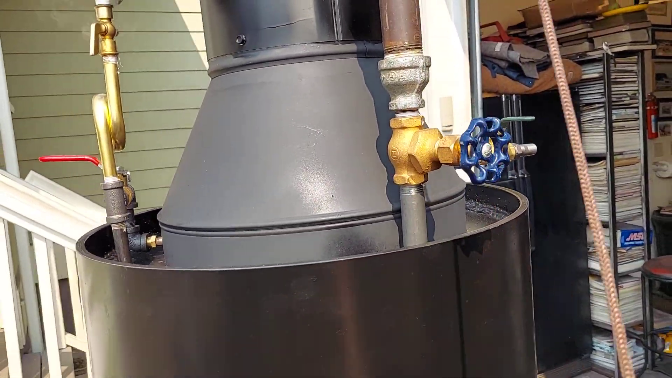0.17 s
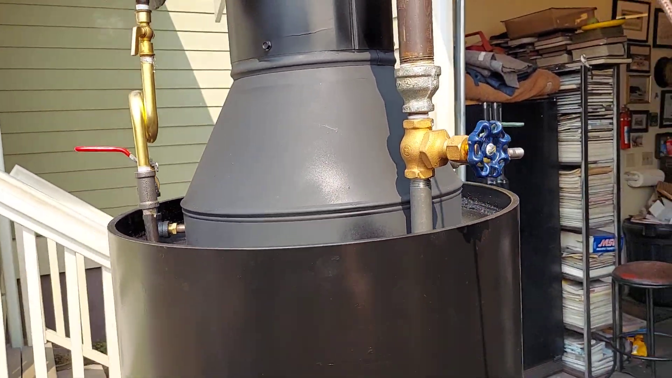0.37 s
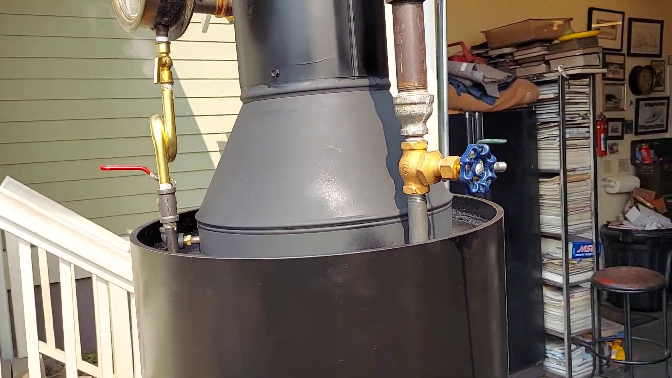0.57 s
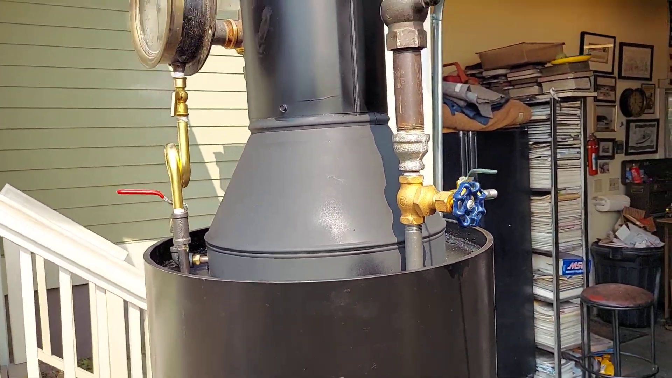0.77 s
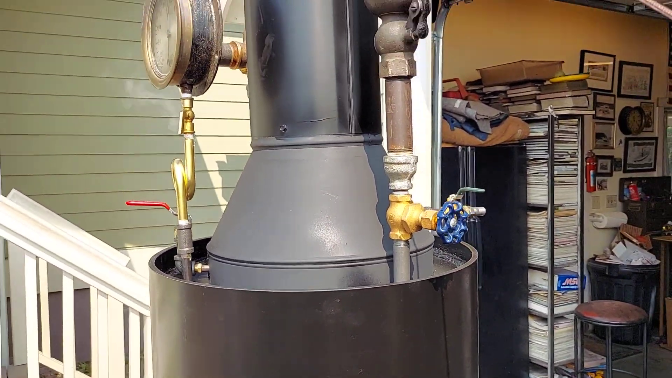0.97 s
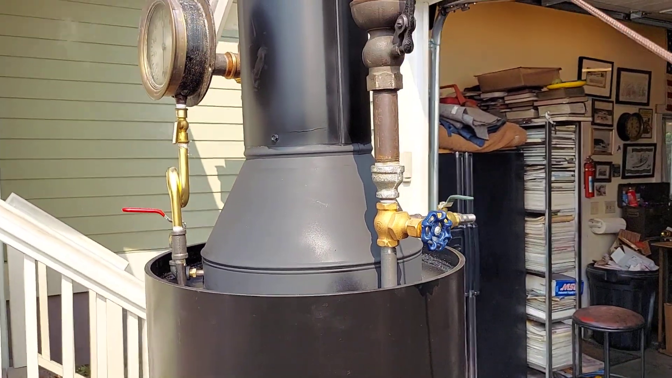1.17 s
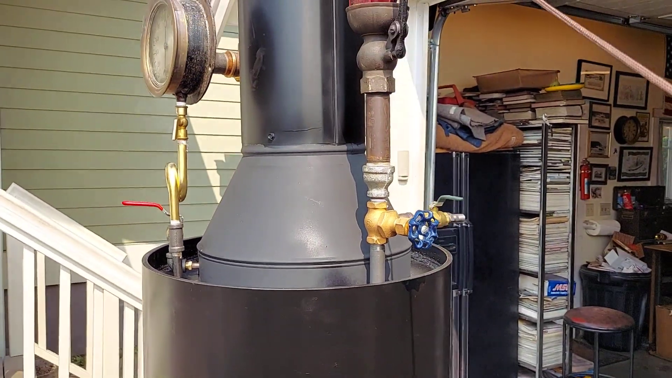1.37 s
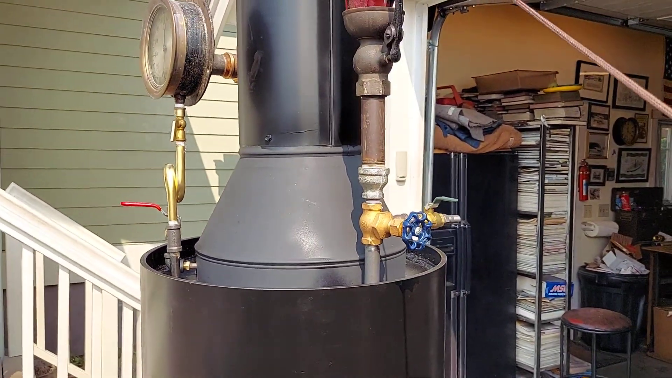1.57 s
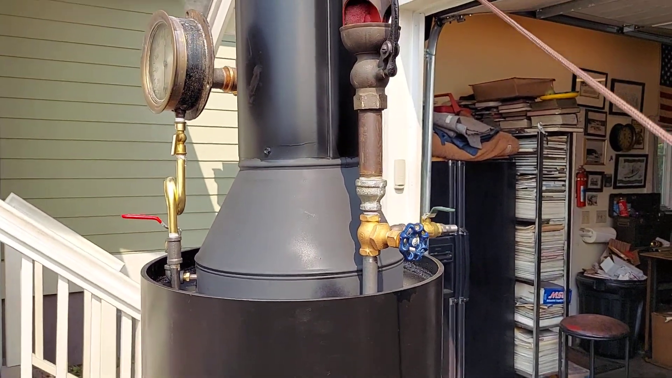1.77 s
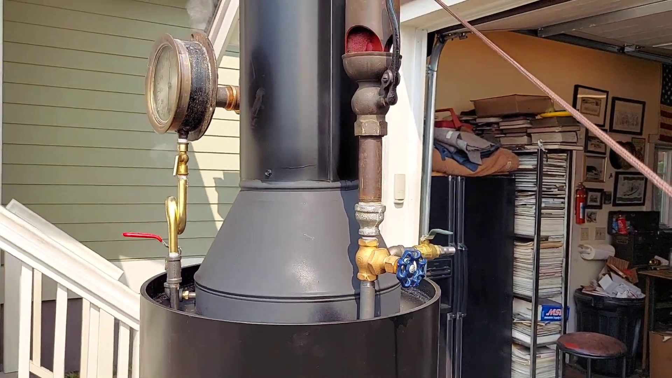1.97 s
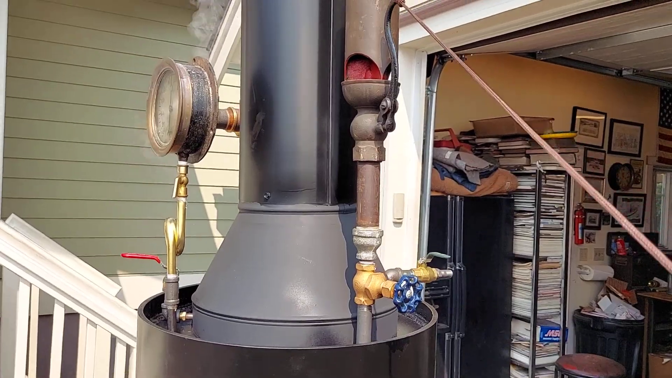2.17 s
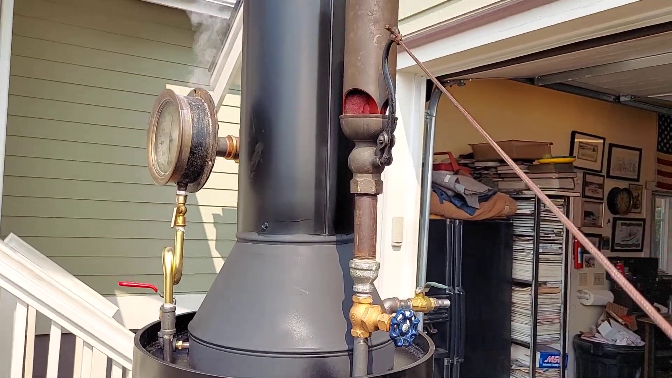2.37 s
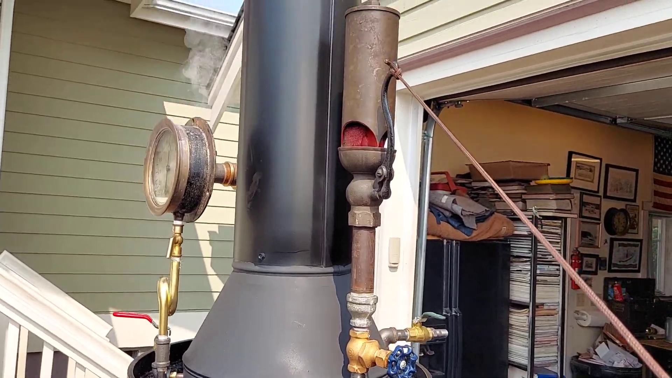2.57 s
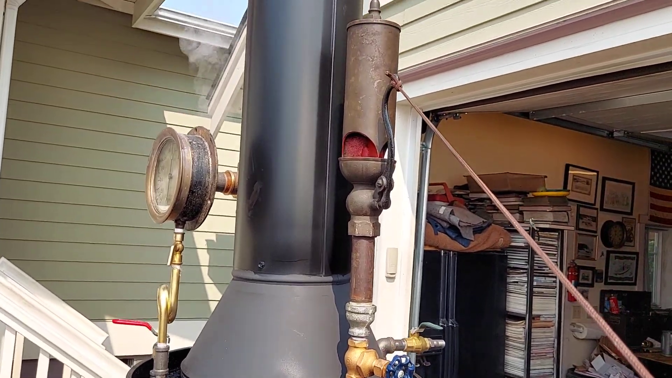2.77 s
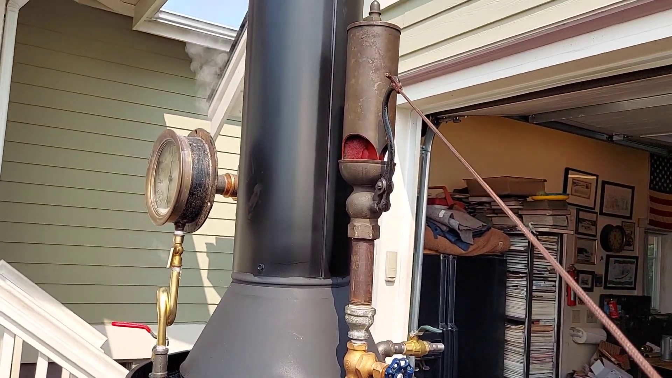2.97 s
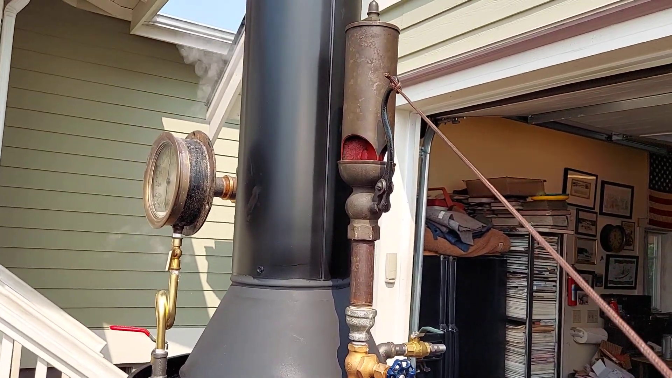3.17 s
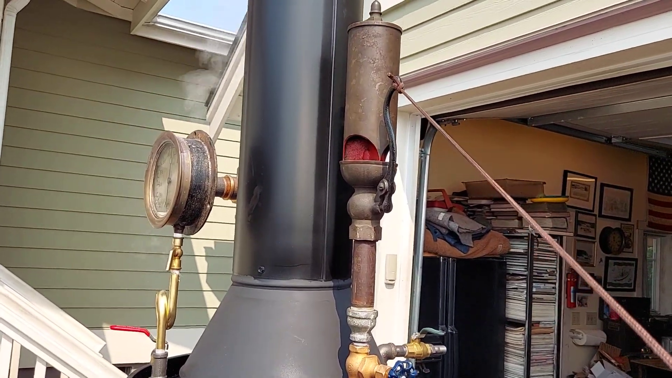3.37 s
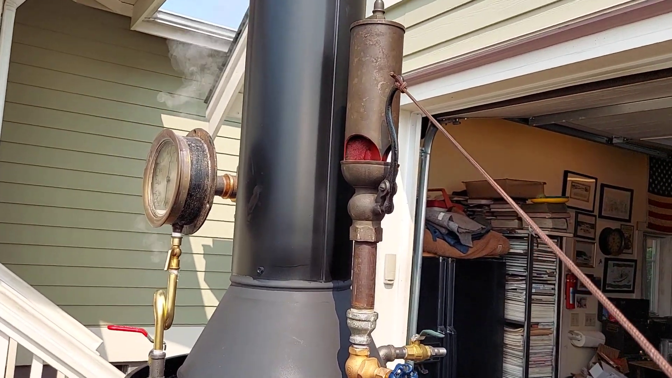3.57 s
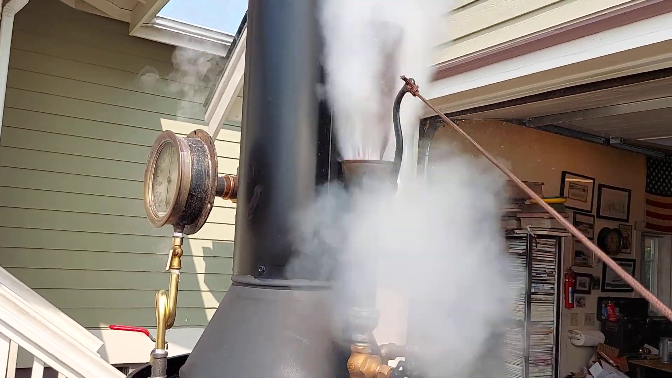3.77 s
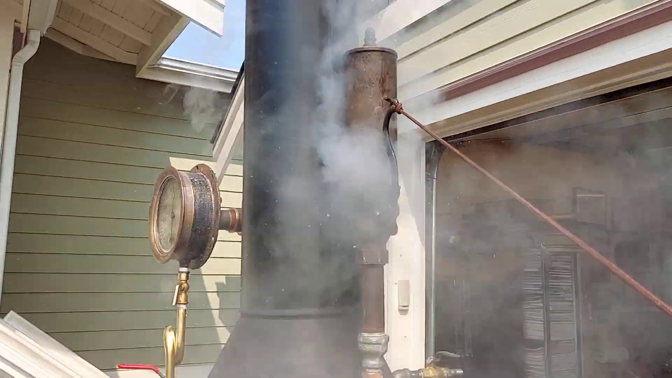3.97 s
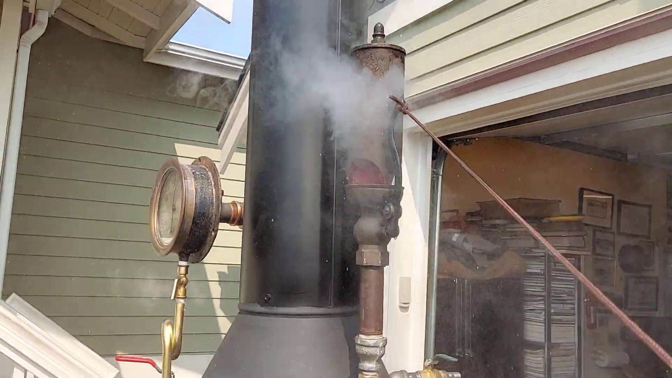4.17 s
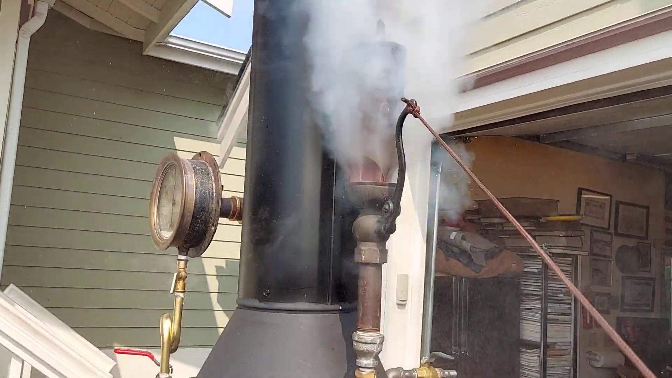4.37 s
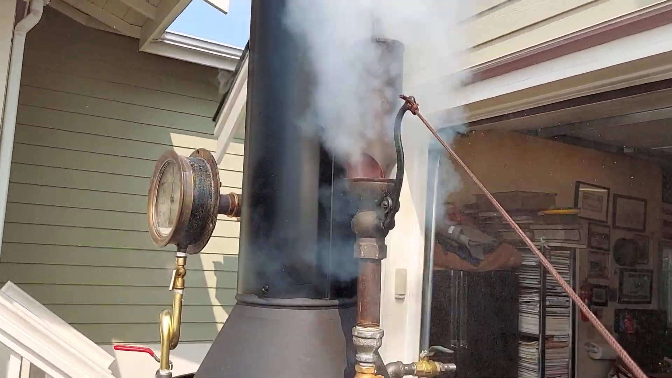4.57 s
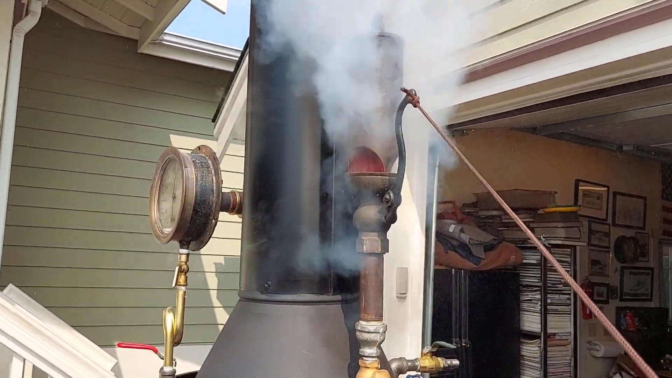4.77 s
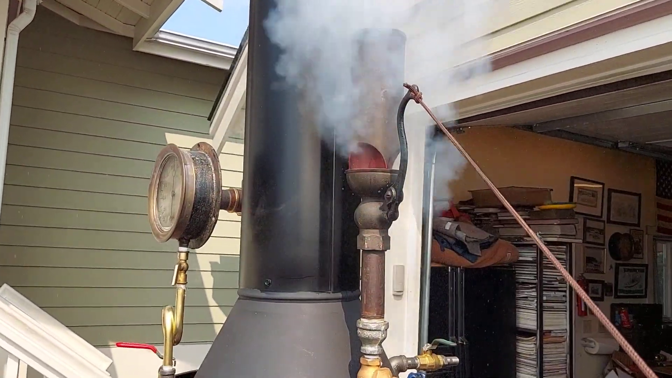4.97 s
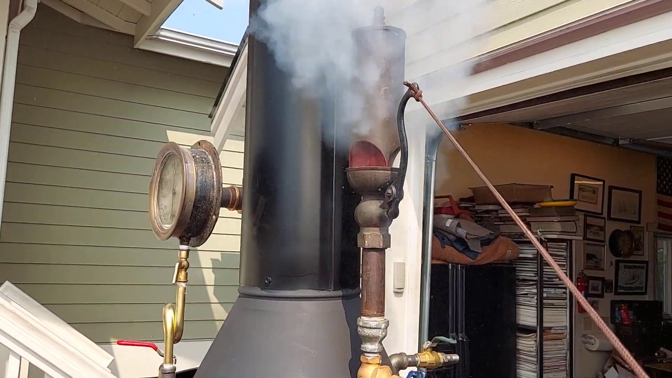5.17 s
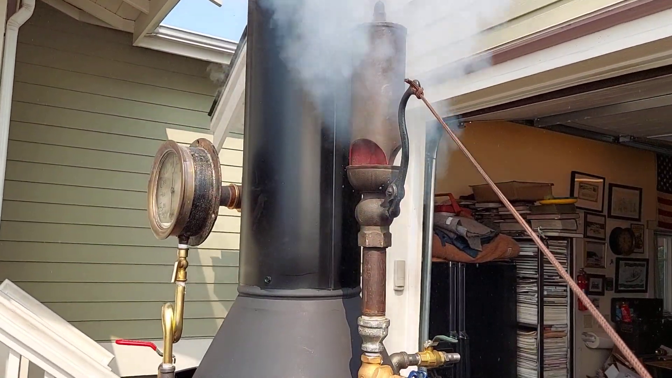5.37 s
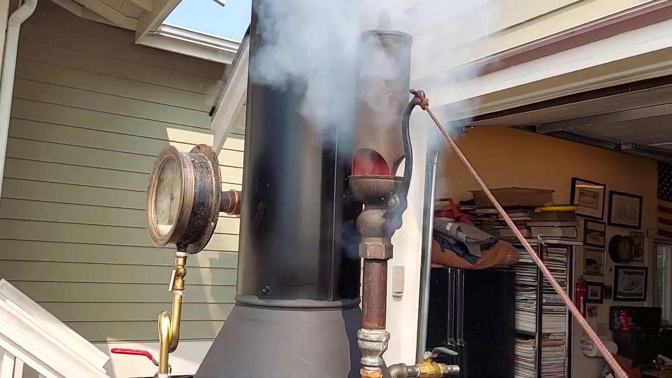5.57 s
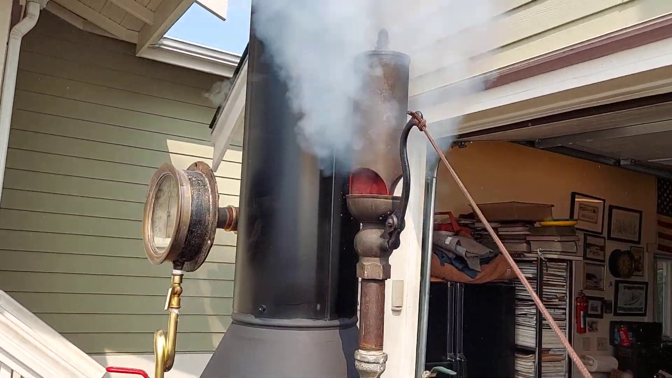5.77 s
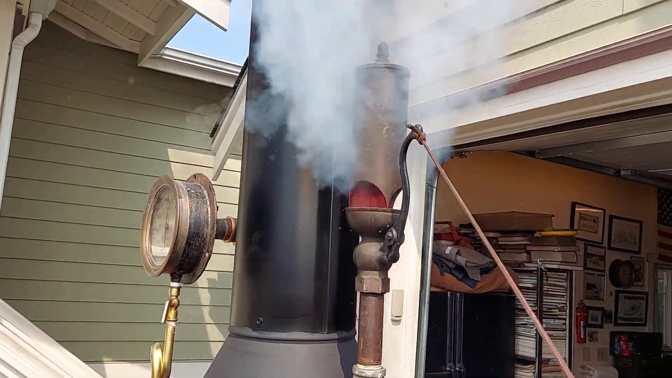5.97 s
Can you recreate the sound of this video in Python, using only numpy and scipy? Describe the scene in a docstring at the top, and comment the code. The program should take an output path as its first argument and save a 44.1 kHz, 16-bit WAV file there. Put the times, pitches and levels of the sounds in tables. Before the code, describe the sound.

From 0 to 3.6 seconds a small boiler idles quietly outdoors by an open garage: uneven low burner rumble, a chimney drone that swells and fades, thin fizzing steam and faint airy pipe resonances. Small scuffs or ticks come near 0.2, 0.4 and 0.7, a duller bump around 1.0, a faint one at 2.4 and a hollow scrape at 3.4. At about 3.7 the steam whistle bursts in very loud, with a watery thump, spitting hiss and unstable, flat notes climbing quickly. It shuts at 4.0; a beating echo drops away fast. At 4.24 it blasts again, scooping up into a rough three-note chord around the octave above middle C, with higher overtones. Bright hiss, mid rush and low buffeting surround it. The chord sharpens slightly, wavers and holds until the cut at 6.0. Phone pickup a few metres away, wide stereo, the background pushed down by the blast.

```python
"""A three-chamber steam whistle on a small boiler, a few metres from a phone by an open garage.
First a quiet wait: filtered noise as burner rumble, chimney drone and leaking steam, with a few scuffs.
Then the rope is pulled: a short wet blast, a falling echo of beating tones, and a long blast.
Each chamber is a stopped pipe, sines on its first and third mode, whose pitch climbs as it warms.
The jet is shaped noise: it hisses, rushes and buffets the phone, and the yard sinks under the blast."""
import sys
import numpy as np
from scipy import signal
from scipy.fft import rfft, irfft
from scipy.io import wavfile
from scipy.ndimage import uniform_filter1d

SR = 44100
rng = np.random.default_rng(int(sys.argv[2]) if len(sys.argv) > 2 else 0)


def put_to_file(sound):
    """Save the sound as 16-bit audio at rate SR, in the file named by the first command-line argument."""
    columns = np.atleast_2d(sound).T  # one column per channel
    safe = np.clip(columns, -1, 1)
    whole_steps = np.round(safe * 32767)
    wavfile.write(sys.argv[1], SR, whole_steps.astype(np.int16))


N = 264996
T = np.arange(N) / SR  # time [s]
F = np.arange(N // 2 + 1) * SR / N  # frequency [Hz]

# direction of the tones, left minus right: (time [s], first modes [dB], third mode of chambers 1, 2, 3 [dB])
TONE_DIRECTION = [(3.7, 6, 1, 11, 6), (3.79, -10, 2, 11, 5), (3.92, -21, -8, -2, 3.5), (4.0, 6, -6, 24, 4),
                  (4.05, 1, 22, 11, 7), (4.23, 5, 0, 6, 2), (4.34, -24, -15, 1, 3), (4.5, -19, -8, 12, 5),
                  (4.84, -19.5, -14, 13, 4), (4.93, -19, -6, -3, 3), (6.009, -16.5, -1.5, 0, 2.5)]

SHUT_FROM_S, SHUT_TO_S = 4.0, 4.228  # the valve is closed and only the garage echo is heard
SHORT_OPENS_S, LONG_OPENS_S = 3.76, 4.235  # steam begins to warm the chambers
FLAT_HZ = 15100  # hiss spectra stay level above this


def whistle():
    """Stopped-pipe resonance: odd modes dominate; turbulence shakes pitch and level, and the echoes beat."""
    # per chamber: (third mode multiple, left offset of first mode [dB], left lead of first, of third mode [rad])
    voicing = [(3, -1.5, 0.49, 0.46), (3, 9, 0.46, -0.99), (2.98, -1, 0.85, -0.077)]
    # per chamber: (warm pitch [Hz], flat share at start of short pull, of long pull, warming time [s],
    # echo fall of first mode [dB/s], of third mode [dB/s])
    chambers = [(541, .075, .05, .33, 170, 134), (626, .055, .045, .7, 147, 166),
                (729.2, .05, .048, .45, 135, 170)]
    # per chamber, one table for each pull: (time [s], first mode [dB], third mode [dB])
    mode_levels = [
        [[(3.66, -70, -53), (3.704, -43, -37), (3.714, -17, -22), (3.742, -14, -33), (3.765, -37, -46),
         (3.79, -17.5, -16.5), (3.85, -14, -21.5), (3.9, -23, -21), (3.96, -24.5, -21), (3.993, -12, -31),
         (4.015, -24, -31)], [(4.232, -53, -45), (4.243, -40, -12.5), (4.27, -28, -9), (4.32, -24.5, -29),
         (4.37, -26.5, -21.5), (4.7, -24.5, -26), (5.0, -24, -23), (6.009, -24.5, -22.5)]],
        [[(3.66, -75, -56), (3.703, -44, -31), (3.716, -26, -31), (3.76, -31, -35), (3.82, -35, -16),
         (3.86, -47, -15.5), (3.915, -39, -13), (3.936, -33, -42), (3.955, -17, -19), (3.98, -21, -18),
         (4.01, -23.5, -26.5)], [(4.228, -55, -40), (4.246, -21, -28), (4.272, -49, -10.5), (4.32, -39, -12),
         (4.35, -25, -22), (4.45, -30, -25.5), (4.9, -33, -26), (5.3, -31, -25), (5.5, -31, -19.5),
         (6.009, -26, -21.5)]],
        [[(3.66, -64, -70), (3.696, -55, -36), (3.725, -15.5, -34), (3.77, -41, -43), (3.795, -18, -27),
         (3.85, -21.5, -30), (3.966, -16, -28), (3.985, -29, -42), (4.0, -25, -42)], [(4.226, -57, -54),
         (4.245, -27, -42), (4.27, -22, -21), (4.295, -19, -31), (4.43, -15, -36), (4.52, -16, -31),
         (4.68, -15.5, -32.5), (6.009, -16, -37.5)]],
    ]
    # per chamber, weak overtones: (multiple, level against the mean of both modes' levels [dB])
    overtones = [
        [(2, -15.5), (6, -20)],
        [(2, -14.5), (4, -15.5), (5, -18), (6, -19.5)],
        [(2, -34), (4, -16)],
    ]
    # per chamber: share by which the third mode runs sharp in the short pull
    wet_sharp = (.012, .002, .002)
    waver_hz, flutter_db = 1.496, 0.63
    first_pan_db, *third_pans_db = curves(TONE_DIRECTION)
    shut = uniform_filter1d(1. * (T > SHUT_FROM_S) * (T < SHUT_TO_S), size=800)
    out, firsts = 0, []
    for voice, chamber, pulls, weak, sharp, third_pan_db in zip(
            voicing, chambers, mode_levels, overtones, wet_sharp, third_pans_db):
        third, offset_db, first_lead, third_lead = voice
        *tuning, first_fall, third_fall = chamber
        first_db, third_db = played(pulls, (first_fall, third_fall))
        phase = 2 * np.pi * np.cumsum(pitch(*tuning) + waver_hz * walk(60)) / SR
        firsts.append((phase, first_db))
        # the sharpening phase stops growing when the long pull begins
        short_phase = np.minimum(phase, phase[int(SHUT_TO_S * SR)])
        third_phase = third * (phase + sharp * short_phase)
        partials = [
            (third_phase, third_db, third_pan_db + 1.9 * walk(11), third_lead + 0.45 * walk(9.4)),
            (phase, first_db, first_pan_db + offset_db + 2.8 * walk(6.7), first_lead)]
        for multiple, db in weak:
            # the second partial rides on the steam sheet and weakens with it
            weak_db = (first_db + third_db) / 2 + db - 9 * shut * (multiple == 2)
            partials.append((multiple * phase, weak_db, third_pan_db / 2, 0))
        for partial_phase, db, pan_db, lead in partials:
            shaken_db = db + flutter_db * walk(50) + shut * beating()
            out = out + tone(partial_phase, shaken_db, pan_db, lead)
    out = out + combination_tones(firsts, first_pan_db / 2, shut) + slugs()
    return out * np.interp(T, [3.65, 3.67], [0, 1])


def pitch(warm_hz, flat_short, flat_long, warming_s):
    """Sound speed rises with temperature: each pull starts flat and climbs; the echo keeps the last pitch."""
    wet_flat, wet_warming_s = .035, .12  # the wet short pull stays flat by this share and climbs quickly
    scoop, scoop_s = 0.01513, 0.0408  # extra flat share while the long pull catches
    blown_short = np.clip(T, SHORT_OPENS_S, SHUT_FROM_S) - SHORT_OPENS_S
    blown_long = np.maximum(T - LONG_OPENS_S, 0)
    short = wet_flat + (flat_short - wet_flat) * np.exp(-blown_short / wet_warming_s)
    long = flat_long * np.exp(-blown_long / warming_s) + scoop * np.exp(-blown_long / scoop_s)
    return warm_hz * (1 - np.where(T < SHUT_TO_S, short, long))


def beating():
    """Interference: two echoes of slightly different pitch drift in and out of step; level in dB."""
    depth, beat_hz = .85, 22
    turn = 2 * np.pi * (rng.random() + np.cumsum(beat_hz * (1 + .5 * walk(15))) / SR)
    return 20 * np.log10(np.abs(1 + depth * np.exp(1j * turn)))


def combination_tones(firsts, pan_db, shut):
    """Nonlinear mixing: the shared steam sheet mixes the lowest and highest notes into two further tones."""
    (low, low_db), _, (high, high_db) = firsts
    out = 0
    for phase, mix_db in [(2 * low - high, -21), (2 * high - low, -39)]:
        db = (low_db + high_db) / 2 + mix_db - 9 * shut + 2 * walk(30)
        out = out + tone(phase, db, pan_db, 0)
    return out


def slugs():
    """Impulsive excitation: a slug of water clears the slit and thumps the chambers, a sine in a bell envelope."""
    # (centre [s], length [s], pitch [Hz], peak level [dB], left minus right [dB])
    thumps = [(3.686, .004, 520, -33, 4), (3.7265, .0036, 590, -6, 1.5), (4.245, .005, 680, -16, 1.5)]
    out = 0
    for s, length_s, hz, db, pan_db in thumps:
        envelope = np.exp(-((T - s) / length_s) ** 2)
        out = out + envelope * tone(2 * np.pi * hz * (T - s), db, pan_db + 0 * T, 0)
    return out


def jet():
    """Turbulent jet noise: bright hiss from the slit, a duller rush around the tones, and gusts on each port."""
    # one table for each pull: (time [s], hiss [dB], buffet [dB])
    jet_levels = [
        [(3.62, -64, -56), (3.665, -61, -60), (3.708, -23, -32), (3.736, -30.5, -32), (3.784, -19.5, -24.5),
         (3.81, -21.5, -24.5), (3.85, -23.5, -23.5), (3.965, -24.5, -27), (4.0, -37.5, -26)],
        [(4.215, -75, -70), (4.244, -21, -23), (4.28, -26, -27), (4.4, -26, -26), (4.5, -27, -27),
         (4.8, -28.5, -28.5), (6.009, -28.3, -27.5)],
    ]
    buffet_fall = 1200  # [dB/s]: the buffet just stops, while the others echo
    hiss_db, buffet_db = played(jet_levels, (150, buffet_fall))
    top_db, _ = played(jet_levels, (177, buffet_fall))
    rush_db, _ = played(jet_levels, (164, buffet_fall))
    pan_db = 3.5 + 0.5 * walk(15)  # left minus right
    out = hiss(hiss_db, top_db, pan_db) + rush(rush_db, pan_db - 4) + buffet(buffet_db)
    return out * np.interp(T, [3.6, 3.64], [0, 1])


def hiss(body_db, top_db, pan_db):
    """Partial coherence: each port hears its own noise plus a shared one that reaches the left port late."""
    # (frequency [Hz], relative level per Hz [dB])
    spectrum = [(1410, -30), (2400, 4.5), (2520, -5), (2620, -5.5), (3130, -1), (3860, -1), (5530, -5),
                (6370, -6), (7620, -8.5), (8700, -8), (10600, -16.5), (11300, -13), (12400, -10.5),
                (15100, -8), (15500, -12)]
    shared, lag = .35, 17  # share of power common to both ports, lag of the left port [samples]
    gust = walk(30)
    out = 0
    for low_hz, high_hz, db, turn_db in [(2440, 7040, body_db, -0.34), (7000, np.inf, top_db + 0.13, -1.3)]:
        def band(f):
            return undb(along(spectrum, np.minimum(f, FLAT_HZ))) * (f > low_hz) * (f <= high_hz)
        left, right, both = unit(shaped(band, channels=3))
        own = np.array([left, right])
        common = np.array([np.roll(both, lag), both])
        noise = np.sqrt(1 - shared) * own + np.sqrt(shared) * common
        level = undb(db + 0.47 * gust + 0.84 * walk(20))
        out = out + noise * level * spread(pan_db + turn_db, 2.4)
    return out


def rush(level_db, pan_db):
    """Broadband turbulence: mid-frequency noise around the tones, set 6 dB over the given hiss level."""
    # (frequency [Hz], relative level per Hz [dB])
    spectrum = [(250, -6.5), (400, -2.5), (700, 3.5), (1100, -2), (1700, 2), (2500, -2), (3500, -15.5)]
    noise = unit(shaped(lambda f: undb(along(spectrum, f) - 60 * (f < 200) - 60 * (f > 3600))))
    return noise * undb(0.88 * walk(20)) * undb(level_db + 6) * spread(pan_db, 1.04)


def buffet(level_db):
    """Incoherent pressure: unrelated low gusts strike the ports, deeper at the start of the long pull."""
    # (frequency [Hz], relative level per Hz [dB])
    spectrum = [(15, -45), (25, -12), (71, 6), (166, 2.5), (308, -0.5), (348, -1.5), (380, 0), (480, -1.5),
                (620, -58), (1060, -120)]
    deep_db, deep_s = 3, 0.44
    noise = unit(shaped(lambda f: undb(along(spectrum, f)) * (f < 900)))
    noise = noise * undb(1.2 * np.array([walk(25), walk(25)]))
    boost_db = deep_db * np.exp(-np.abs(T - LONG_OPENS_S) / deep_s) * (T > SHUT_FROM_S)
    noise = noise + lowpassed(noise, 90) * (undb(boost_db) - 1)
    pan_db = 6 + 0.74 * curves(TONE_DIRECTION)[0]  # turns with the first modes
    return noise * undb(level_db) * spread(pan_db, 1.42)


def yard():
    """Superposition of independent sources, mostly stronger on the left port and alike in the bass."""
    # (frequency [Hz], left minus right [dB])
    direction = [(60, 13), (110, 10.5), (200, 5.5), (380, 7.5), (700, 1), (1290, 7.5), (2380, 5),
                 (4400, 1.5), (8120, 2), (15000, -3)]
    # (frequency [Hz], likeness of the ports 0-1, negative values count as 0)
    likeness = [(60, 0.6), (130, 1), (290, 0.82), (640, 0.84), (1410, 0.42), (3100, 0.078), (6820, -0.43),
                (15000, -0.38)]
    lag = 4  # of the left port [samples]
    left, right, both = rfft(burner() + chimney() + leaking_steam() + scuffs())
    like = np.clip(along(likeness, F), 0, 1)
    delay = np.exp(-2j * np.pi * np.outer([lag, 0], F) / SR)
    ports = np.sqrt(1 - like) * np.array([left, right]) + np.sqrt(like) * both * delay
    return irfft(ports * spread(along(direction, F), 0.98) * np.sqrt(2 / (1 + like)), N)


def burner():
    """Combustion noise: a broad rumble whose bass swells at random."""
    # (frequency [Hz], relative level per Hz [dB])
    spectrum = [(15, -36), (25, -5), (76, -2.5), (376, -22.5), (584, -20), (694, -25.5), (793, -15.5),
                (1100, -26), (1870, -22), (2400, -29.5), (3120, -56), (5280, -120)]
    bed = undb(-44.5) * unit(shaped(lambda f: undb(along(spectrum, f)), channels=3))
    swell = undb(2.5 * walk(5.97) + 1.2 * walk(23))
    return bed + lowpassed(bed, 260) * (swell - 1)


def chimney():
    """Air-column resonance: the chimney drones with the burner, noise through three resonances."""
    # (frequency [Hz], width [Hz], relative level [dB])
    flue = [(62, 8.2, 4.5), (124, 18, -16.5), (209, 27, -15)]
    # (time [s], level [dB])
    drone_level = [(0, -56), (.6, -68), (.68, -43), (.9, -56), (1.1, -43), (1.5, -42), (2.1, -57),
                   (2.25, -60), (2.48, -41), (2.72, -62), (2.82, -42.5), (3.1, -50), (3.7, -48)]
    drone_db, = curves(drone_level)

    def gain(f):
        return sum(undb(db) * ring(hz, width_hz)(f) ** 2 for hz, width_hz, db in flue)
    return undb(drone_db) * unit(shaped(gain, channels=3))


def leaking_steam():
    """Flow noise: a thin leak fizzes, and escaping steam excites resonances in the pipework."""
    # (frequency [Hz], relative level per Hz [dB])
    fizz = [(1410, -34), (2400, -8.5), (2990, -3.5), (3440, -7), (4080, -6.5), (6420, -8.5), (7860, -6.5),
            (11400, -9), (15500, -4)]
    # pipework resonances: (frequency [Hz], width [Hz])
    pipework = [(600, 73), (810, 100), (1900, 190), (3050, 170)]
    # (time [s], level of each of the four resonances [dB])
    ring_levels = [(0, -58, -60, -53.5, -74), (.45, -67, -69, -54.5, -71), (.75, -63, -58, -58.5, -66),
                   (1.1, -59, -56, -57, -57.5), (2.2, -67, -59.5, -62.5, -63), (2.95, -69, -53.5, -58, -61),
                   (3.6, -70, -56, -54, -56)]
    noise = unit(shaped(lambda f: undb(along(fizz, np.minimum(f, FLAT_HZ))), channels=3))
    out = undb(-45 + walk(9.5)) * noise
    for (hz, width_hz), db in zip(pipework, curves(ring_levels)):
        out = out + undb(db + 1.8 * walk(8.0)) * ringing(hz, width_hz)
    return out


def scuffs():
    """Friction noise: scuffs and ticks nearby, short resonant bursts with a gritty level."""
    # (centre [s], length [s], centre frequency [Hz], width [Hz], level before the grit [dB])
    bursts = [(0.193, 0.011, 2500, 7000, -40.5), (.42, .04, 1500, 1500, -54),
              (0.685, 0.067, 500, 1500, -49.5), (0.963, 0.078, 420, 500, -39.5),
              (0.966, 0.089, 795, 1490, -42), (0.957, 0.037, 3200, 3000, -50),
              (0.983, 0.025, 950, 250, -46), (0.995, 0.038, 159, 150, -39.5),
              (2.432, 0.079, 3800, 1500, -53), (3.412, 0.12, 1540, 1000, -47.5),
              (3.432, 0.096, 1690, 130, -43.5), (3.408, .05, 1950, 200, -49)]
    out = 0
    for s, length_s, hz, width_hz, db in bursts:
        grit = undb(2.5 * walk(250))
        envelope = np.exp(-((T - s) / (length_s / 2)) ** 4)
        out = out + undb(db) * grit * envelope * ringing(hz, width_hz)
    return out


def played(pulls, falls_db_s):
    """Exponential decay: level columns of both pulls; between them the garage echo falls at a steady dB rate."""
    short_pull, long_pull = pulls
    since = np.maximum(T - short_pull[-1][0], 0)
    again = T > long_pull[0][0]
    levels = []
    for short, long, fall in zip(curves(short_pull), curves(long_pull), falls_db_s):
        echo = short - fall * since
        levels.append(np.where(again, np.maximum(long, echo), echo))
    return levels


def tone(phase, db, pan_db, lead):
    """Interaural cues: a sine placed between the ports by level; the left one leads by a phase angle."""
    return np.sqrt(2) * undb(db) * spread(pan_db, 1) * np.sin([phase + lead, phase])


def spread(pan_db, power):
    """Level panning: port gains that keep the sum level, power 1 for alike channels, 2 for unrelated ones."""
    left = undb(pan_db)
    return 2 * np.array([left, np.ones_like(left)]) / (1 + left ** power) ** (1 / power)


def walk(rate):
    """Random modulation: levels held 1 / rate s [rate in Hz] and slewed twice; spread near 1."""
    k = int(SR / rate)
    held = np.repeat(rng.standard_normal(N // k + 1), k)
    return 1.288 * uniform_filter1d(uniform_filter1d(held, k), k)[:N]


def shaped(gain, channels=2):
    """Spectral shaping: unrelated white noises with the given gain per frequency."""
    return irfft(rfft(rng.standard_normal((channels, N))) * gain(F), N)


def ring(hz, width_hz):
    """Simple resonator: gain of one resonance over frequency."""
    return lambda f: 1 / np.sqrt(1 + ((f - hz ** 2 / (f + 1)) / width_hz) ** 2)


def ringing(hz, width_hz):
    """Excited resonance: three unit-level noises through one resonance applied twice."""
    return unit(shaped(lambda f: ring(hz, width_hz)(f) ** 2, channels=3))


def lowpassed(x, hz):
    """Second-order low-pass filtering."""
    return signal.sosfilt(signal.butter(2, hz, fs=SR, output="sos"), x)


def curves(table):
    """Linear interpolation: columns joined by straight lines in time, corners rounded over 4 ms."""
    s, *columns = np.transpose(table)
    return [uniform_filter1d(np.interp(T, s, column), size=176) for column in columns]


def along(points, hz):
    """Log-frequency interpolation of a (frequency [Hz], value) table."""
    p = np.array(points)
    return np.interp(np.log(hz + 1), np.log(p[:, 0] + 1), p[:, 1])


def unit(x):
    """Normalisation to an RMS of 1 over all channels."""
    return x / np.sqrt(np.mean(x ** 2))


def undb(db):
    """Decibel law: amplitude ratio of a level."""
    return 10 ** (np.asarray(db) / 20)


def scene():
    """Gain reduction: the yard sinks with the loudest blast so far and does not recover."""
    blast = whistle() + jet()
    # the phone turns its gain down once it has heard a loud blast; blast levels are given after that gain
    power = uniform_filter1d(np.mean(blast ** 2, axis=0), size=1000)
    loudest = np.maximum.accumulate(np.sqrt(power))
    return blast + yard() * np.minimum(1, undb(-29) / (loudest + 1e-9))


def record(dry):
    """Band-limiting and soft saturation: the microphone drops deep bass, peaks are rounded, the top is cut."""
    bass_cut = signal.sosfilt(signal.butter(3, 44, "high", fs=SR, output="sos"), dry)
    soft = np.tanh(.8 * bass_cut) / 0.81
    top_cut = signal.ellip(14, .2, 85, 15760, fs=SR, output="sos")
    return np.clip(signal.sosfilt(top_cut, soft), -1, 1)


dry = scene()
out = record(dry)
put_to_file(out)
```